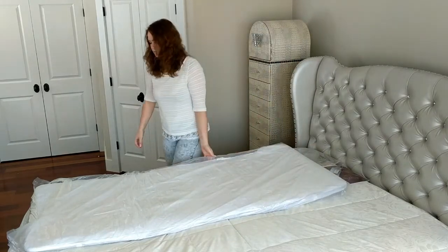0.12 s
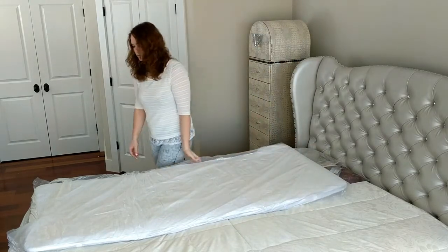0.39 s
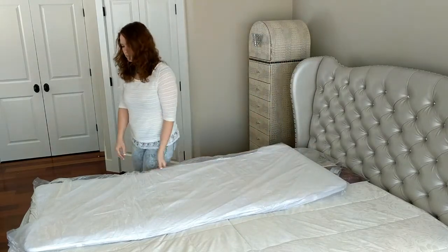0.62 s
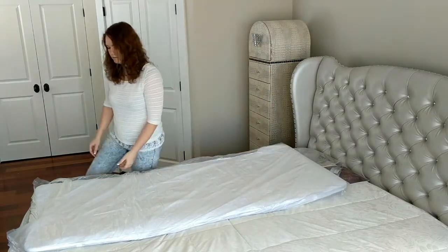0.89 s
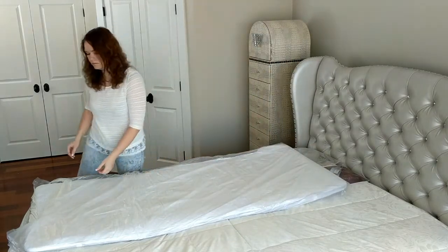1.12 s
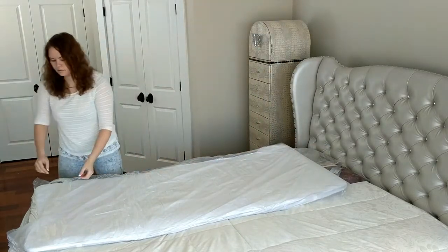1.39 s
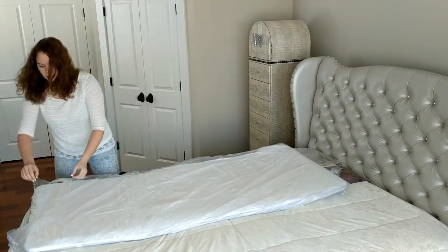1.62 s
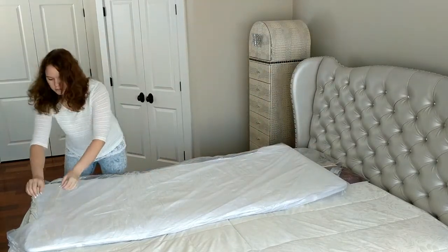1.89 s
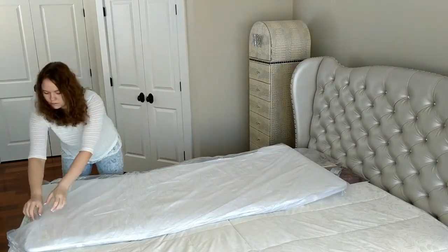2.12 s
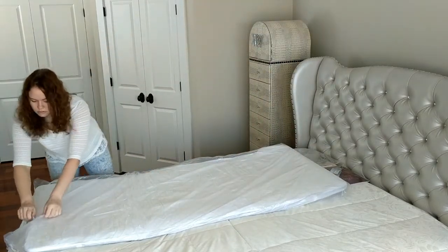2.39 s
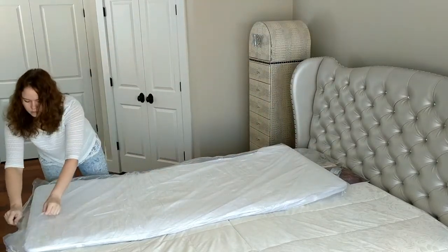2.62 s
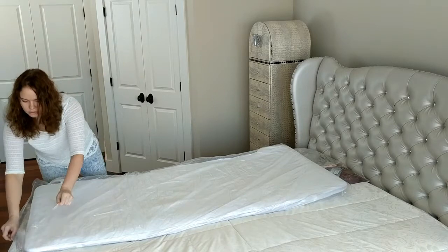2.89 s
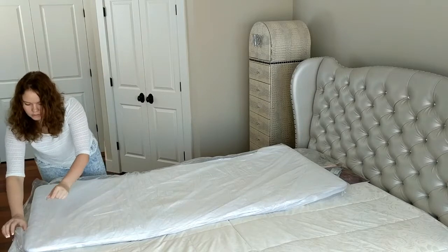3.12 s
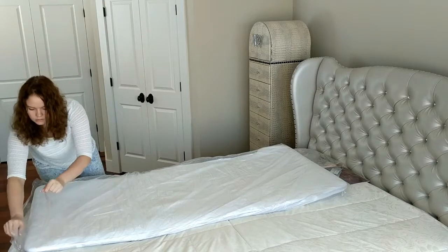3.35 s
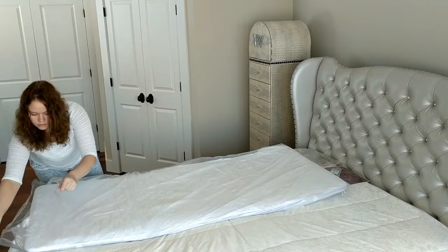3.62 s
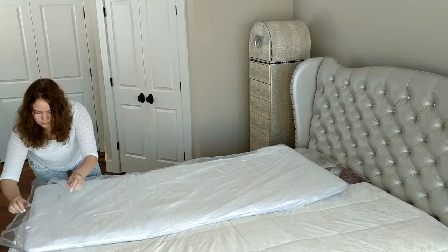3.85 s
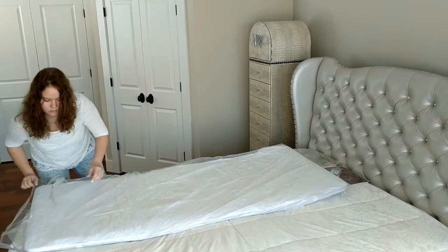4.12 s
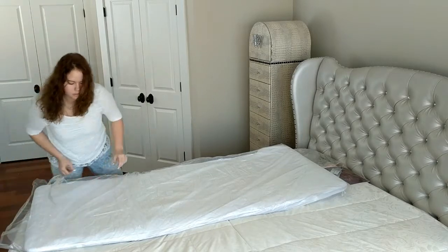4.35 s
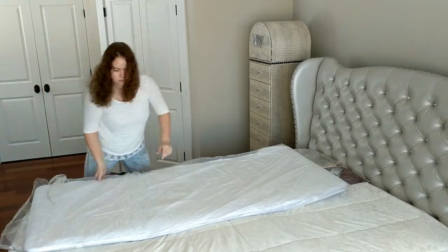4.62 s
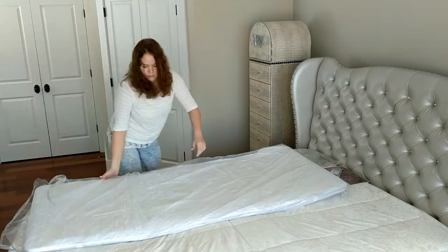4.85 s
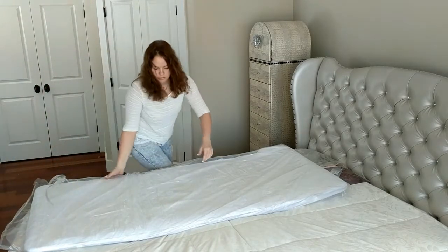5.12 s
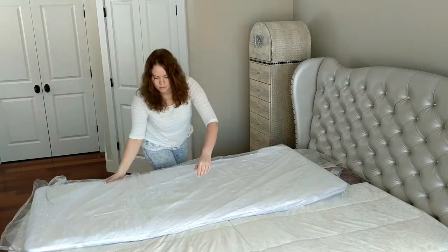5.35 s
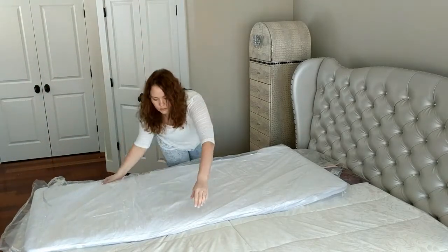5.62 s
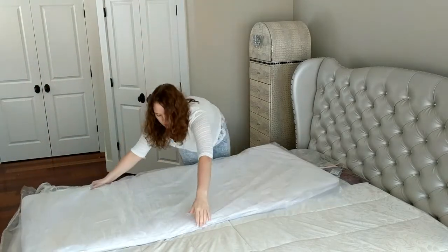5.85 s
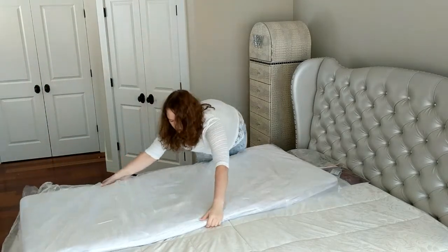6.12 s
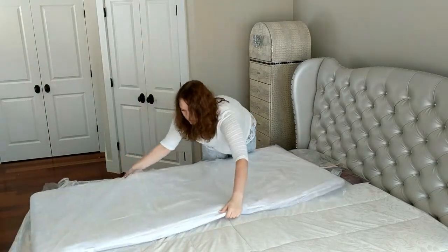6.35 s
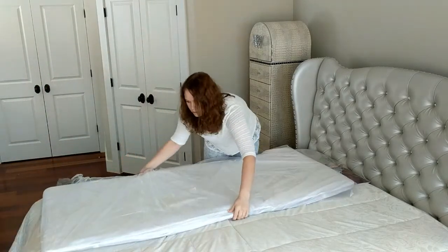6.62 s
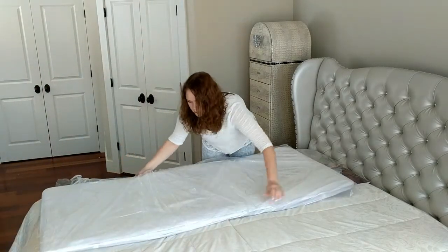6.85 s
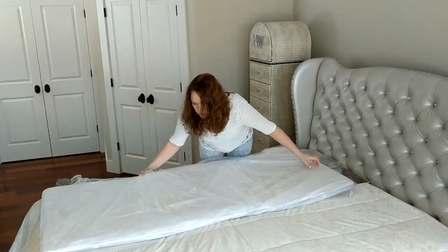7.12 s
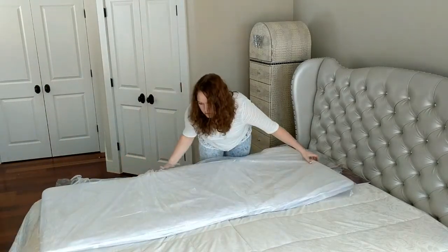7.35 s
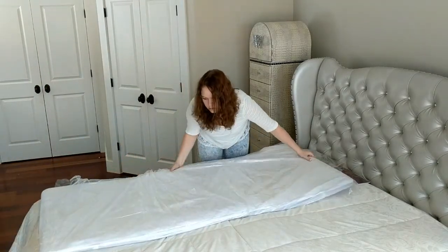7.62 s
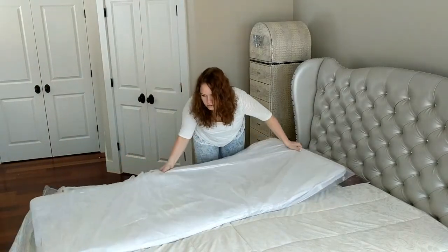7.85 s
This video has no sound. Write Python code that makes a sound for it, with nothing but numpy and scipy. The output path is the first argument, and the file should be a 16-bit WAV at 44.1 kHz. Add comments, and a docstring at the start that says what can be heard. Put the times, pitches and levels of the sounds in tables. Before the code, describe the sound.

Plastic wrapping rustles softly, goes almost quiet as someone steps with muffled low thuds, then crackles brightly in sharp tugs. Small sparse ticks follow in the middle, before a fuller sustained drag of crinkling film with bed and floor bumps. Further uneven rustles and snaps last to the end, rising again. Indoors in a bedroom, slight reverberation, very faint background hiss, mono pickup.

```python
"""Thin plastic film rustles from the start as hands pull and drag it around a padded mat on a bed.
Soft thuds of feet and a leaning knee come through the wooden floor and bed frame, over a faint room hiss.
Creases buckle as random tiny clicks, dense in a drag and single in a tug; filters give them their pitch.
The film and its snaps get a bedroom tail, the thuds shake wood resonances, and the sound is mono."""
import sys
import numpy as np
from scipy import signal
from scipy.fft import rfft, irfft, next_fast_len
from scipy.io import wavfile
from scipy.ndimage import uniform_filter1d, map_coordinates

SR = 44100
rng = np.random.default_rng(int(sys.argv[2]) if len(sys.argv) > 2 else 0)


def ratio(d):
    """dB to gain"""
    e = np.asarray(d, float) / 20
    return 10 ** e


def generate_wav(sig):
    """Save sig (samples, or channels by samples) to the path in sys.argv[1] as 16-bit PCM at SR."""
    pcm = np.round(np.clip(np.atleast_2d(sig).T, -1, 1) * 32767).astype(np.int16)
    wavfile.write(sys.argv[1], SR, pcm)


N = 352359  # length in samples
TOP_HZ = 15830  # upper limit of the sound


def unit(x):
    """Scaled to rms 1."""
    return x / np.sqrt(np.mean(x ** 2) + 1e-20)


def along(points, hz):
    """Values between (Hz, value) points, on a logarithmic pitch axis."""
    f, v = np.transpose(points)
    return np.interp(np.log(hz + 1), np.log(f + 1), v)


def curves(rows):
    """One value per sample for each column after the time."""
    s, *cols = np.transpose(rows)
    return [np.interp(np.arange(N) / SR, s, c) for c in cols]


def wobble(rate):
    """A smooth random curve through rate random points a second."""
    return map_coordinates(rng.standard_normal(N // 100), [np.arange(N) * rate / SR])


def filtered(x, response):
    """x shaped by a response over frequency."""
    m = next_fast_len(N + SR // 2)
    hz = np.fft.rfftfreq(m, 1 / SR)
    return irfft(rfft(x, m) * response(hz), m)[:N]


def causal(spectrum):
    """The minimum-phase response of a spectrum, so that a click has no sound before it."""
    def response(hz):
        cepstrum = irfft(np.log(ratio(along(spectrum, hz))))
        cepstrum[1:len(hz) - 1] *= 2
        cepstrum[len(hz):] = 0
        return np.exp(rfft(cepstrum))
    return response


def modes(table):
    """A sum of resonances, with every other one upside down."""
    def response(f):
        total = 0
        for k, (centre, width, db) in enumerate(table):
            damping = 1j * f * width
            total = total + (-1) ** k * ratio(db) * damping / (centre * centre - f * f + damping)
        return total
    return response


def buckles(rate, spread_db, clump_db):
    """Clicks of either sign at random moments, rate a second, many small and few large, in clumps."""
    when, size, sign = rng.random((3, N))
    size_db = np.minimum(-spread_db * np.log(1 - size), 11) + clump_db * wobble(45)
    return unit((when < rate / SR) * ratio(size_db) * np.sign(sign - .5))


def swell(s, swell_s, fade_s):
    """A level in dB that climbs to 0 at s and falls away again."""
    swell_db = 20.5  # climbed in swell_s and lost in fade_s
    late = np.arange(N, dtype=np.float32) / SR - s
    before, after = -late / max(swell_s, .004), late / max(fade_s, .004)
    return np.maximum(-swell_db * np.maximum(before, after), -90)


# The colour of the hiss. Each row: frequency in Hz, relative level in dB.
HISS_COLOUR = [(15, -23), (25, 2.5), (76, 4.5), (170, -7.5), (729, -14.5), (1010, -16.5), (3220, -20.5),
               (4330, -25.5), (12100, -29), (15800, -30)]


def hiss():
    """The quiet room and the microphone's own noise: random noise with a fixed colour."""
    noise = filtered(rng.standard_normal(N), lambda hz: ratio(along(HISS_COLOUR, hz)))
    return ratio(-65.5) * unit(noise)


# How long the bedroom rings. Each row: frequency in Hz, time to fall by 60 dB in seconds.
BEDROOM_DECAY = [(150, 0.86), (1000, 0.94), (4000, 0.68), (12000, 0.35)]


def bedroom(x, wet_db):
    """The direct sound plus a noise tail that dies faster in the treble; each third of a second gets a new tail."""
    out, step = np.pad(x, (0, SR)), SR // 3
    for start in range(0, N, step):
        hz, t, z = signal.stft(rng.standard_normal(SR // 2), SR, nperseg=256)
        decay = ratio(-60 * t / along(BEDROOM_DECAY, hz)[:, None])
        tail = signal.istft(z * decay, SR, nperseg=256)[1]
        echo = signal.fftconvolve(x[start:start + step], tail / np.linalg.norm(tail))
        out[start + 130:][:len(echo)] += ratio(wet_db) * echo  # the bed and the nearest wall answer after 3 ms
    return out[:N]


def steadied(x, seconds):
    """x with its chance swells evened out, as a firm push drives a mode without gaps."""
    power = np.abs(uniform_filter1d(unit(x) ** 2, int(seconds * SR)))
    return unit(x / np.sqrt(power + 0.2))


# The body leaning on boards and bed. Each row: time in seconds, load in dB before the trims below.
LEANING = [(0.0, -60), (0.73, -85), (1.02, -85), (1.29, -61), (1.67, -63), (2.07, -66), (2.36, -72),
           (2.83, -59), (3.05, -60.5), (4.18, -79), (4.58, -61), (4.98, -78), (5.3, -66), (6.5, -48),
           (6.72, -56), (7.03, -63), (7.59, -58), (7.99, -65)]
# The leading floor pitch shifts with the place of the load. Each row: time in seconds, pitch in Hz.
LOAD_PLACE = [(0.0, 58.6), (0.22, 56.3), (0.69, 59.3), (1.16, 54.6), (1.33, 45), (1.58, 52.8), (1.87, 70.2),
              (2.25, 66.7), (2.69, 71.7), (3.43, 48.2), (3.76, 72), (3.89, 63.8), (4.43, 65.9),
              (4.58, 53.3), (5.18, 56.4), (5.41, 44.05), (5.76, 61), (7.21, 67.1), (7.34, 67.3),
              (7.61, 44.8), (7.86, 52.4), (7.99, 59.4)]
# Footfalls and pushes of the knee. Each row: peak time in seconds, boom level in dB,
# knock level in dB before its trim, swell time and fade time in seconds (a little shorter for the knock).
FOOT_AND_KNEE = [(.13, -49, -63, 0.044, 0.081), (.33, -51, -73, 0.023, 0.044),
                 (.43, -54.5, -53, .04, 0.069), (.6, -63, -58, 0.065, .06), (0.999, -66, -66, 0.045, 0.065),
                 (1.136, -43, -37.5, 0.0092, 0.091), (1.165, -44, -37.5, 0.031, 0.12),
                 (1.22, -41.5, -59, 0.043, 0.036), (1.33, -47, -72, 0.071, 0.068),
                 (1.47, -68, -58, 0.073, 0.08), (1.65, -65, -58, 0.078, 0.048),
                 (1.87, -52, -49.5, 0.03, 0.093), (2.015, -41, -70, 0.042, 0.053),
                 (2.38, -65, -65, .05, 0.035), (2.67, -56.5, -46.5, 0.21, 0.029),
                 (2.709, -62, -35, 0.022, 0.014), (2.85, -64, -72, .1, .06), (3.43, -50, -47, 0.09, .09),
                 (3.76, -68, -57, .04, 0.079), (4.4, -66, -54, .02, .03), (4.43, -54, -71, 0.046, 0.076),
                 (4.52, -70, -51.5, 0.054, 0.16), (4.61, -48.5, -52, 0.093, .025),
                 (4.69, -56, -70, 0.038, 0.046), (4.811, -56, -71, 0.062, 0.022),
                 (5.05, -62, -77, 0.058, .1), (5.18, -56, -77, .05, .15), (5.32, -51, -69, 0.074, 0.043),
                 (5.41, -53, -69, 0.076, 0.079), (5.63, -51.5, -51, 0.18, 0.046),
                 (5.76, -43, -43, 0.025, 0.036), (5.855, -44.5, -44, 0.13, 0.069),
                 (5.96, -50, -63, 0.086, 0.057), (6.05, -53, -47.5, 0.096, .2),
                 (6.24, -38.5, -41, .05, 0.11), (6.38, -53, -44.5, .06, .06), (6.48, -51, -61, .06, .05),
                 (6.609, -43.5, -38.5, 0.055, 0.074), (6.68, -46.5, -55, 0.077, 0.048),
                 (6.79, -58.5, -56.5, 0.13, 0.018), (7.0, -69, -59, 0.13, .04),
                 (7.09, -50, -60, 0.045, 0.055), (7.19, -64, -64, .1, 0.024), (7.37, -57, -52, 0.22, 0.054),
                 (7.41, -57, -45.5, 0.036, 0.11), (7.54, -51, -54, 0.081, .15),
                 (7.68, -56, -52, 0.074, 0.23), (7.97, -51, -44, .05, 0.047)]
# Low resonances of floor and bed, used twice over.
# Each row: pitch in Hz, width in Hz, level in dB for one pass.
FLOOR_MODES = [(40, 9.9, -10), (71, 33, -7), (92, 31, -5.5)]
# Woody resonances of the bed frame, used twice over.
# Each row: pitch in Hz, width in Hz, level in dB for one pass.
FRAME_MODES = [(119.4, 32, -1.5), (216, 111, 0.5), (348, 145, 2.5), (560, 450, -6.5)]


def weight():
    """Soft pushes shake the low modes of floor and bed, one of them leading; harder contacts knock the wood."""
    (load_db,), (mode_hz,) = curves(LEANING), curves(LOAD_PLACE)
    boom_power = ratio(load_db - 9.0 + 4.1 * wobble(24)) ** 2
    # The handled mat works the bed frame too, following the effort of the hands.
    knock_power = (ratio(-20 + 0.84 * wobble(10)) * effort(0.8)) ** 2
    knock_power += ratio(load_db - 7.0 + 1.8 * wobble(4.8)) ** 2
    for s, boom_db, knock_db, swell_s, fade_s in FOOT_AND_KNEE:
        boom_power += ratio(boom_db + swell(s, swell_s, fade_s)) ** 2
        knock_power += ratio(knock_db - 5.5 + swell(s, 0.95 * swell_s, 0.82 * fade_s)) ** 2
    lead = np.sin(2 * np.pi * np.cumsum(mode_hz + 4 * wobble(14)) / SR)
    floor, frame = modes(FLOOR_MODES), modes(FRAME_MODES)
    boom = filtered(filtered(rng.standard_normal(N), floor), floor)
    knock = filtered(filtered(buckles(300, spread_db=0.5, clump_db=0.0), frame), frame)
    lows = unit(1.3 * lead + .45 * unit(boom))
    return np.sqrt(boom_power) * lows + np.sqrt(knock_power) * steadied(knock, 0.022)


# The steady drag of the film. Each row: time in seconds, effort in dB,
# fineness in dB (how far fine creases outweigh large folds).
STEADY_DRAG = [(0.0, -48, -6), (0.51, -56.5, 5.5), (0.75, -72.5, 4), (1.07, -71.5, -5), (1.6, -61.5, 2),
               (2.07, -66.5, 0), (2.22, -55.5, -2), (2.4, -49.5, -0.5), (2.76, -45.5, 2), (3.09, -64, 3),
               (3.49, -60, -4), (4.07, -67, -5.5), (4.47, -72, -8), (4.67, -50, 1), (4.96, -66.5, -3),
               (5.18, -68, 2), (5.32, -55, 8.5), (5.58, -57.5, -16), (5.81, -67, 0), (6.27, -37, 4.5),
               (6.9, -58.5, 2), (7.12, -53, -10), (7.21, -48.5, -0.5), (7.99, -35, 6)]
# Strokes of the hands over the drag. Each row: peak time in seconds, effort in dB,
# swell time and fade time in seconds, fineness in dB.
HAND_STROKES = [(.17, -51.5, 0.13, 0.035, -2), (.29, -46.5, 0.023, 0.088, 0.5),
                (.44, -52, 0.23, 0.18, -8.5), (.62, -51, 0.21, 0.086, -4.5), (.71, -66, 0.11, 0.13, -15.5),
                (1.16, -59, 0.075, 0.042, -2), (1.22, -60, 0.036, 0.07, -16),
                (1.42, -56.5, 0.035, 0.25, -4), (1.78, -65.5, 0.82, 0.065, -11.5),
                (1.87, -60, 0.035, .12, -4), (2.07, -58, 0.021, 0.14, -2), (2.235, -49.5, 0.063, 0.059, 1),
                (2.257, -44, .006, 0.21, 4.5), (2.335, -42, .03, 0.041, 5), (2.356, -32.5, 0.022, 0.12, 4),
                (2.601, -45, 0.01, 0.21, -5), (2.67, -36.5, 0.07, 0.054, 4), (2.715, -33, 0.11, 0.1, 0),
                (2.83, -40.5, 0.26, 0.1, 3), (2.96, -46, 0.14, 0.16, 0.5), (3.05, -49, 0.025, 0.15, -4.5),
                (3.3, -50.5, 0.045, 0.087, 12), (3.355, -38, 0.047, 0.25, -1),
                (3.429, -36.5, 0.29, 0.091, -0.5), (3.59, -51.5, .005, 0.21, 3),
                (3.76, -50, 0.077, 0.032, -3.5), (3.83, -50.5, 0.15, 0.19, -1), (4.025, -61.5, .02, .15, 3),
                (4.5, -51, 0.029, 0.47, -2), (4.61, -47, 0.15, 0.11, -0.5), (4.75, -64, .05, 0.12, 5),
                (4.94, -58, 0.03, 0.16, -5), (5.085, -57, 0.019, 0.05, 4), (5.16, -50, 0.095, 0.72, -1),
                (5.24, -53, 0.036, 0.053, 5), (5.32, -53, 0.055, 0.23, -7.5),
                (5.56, -46, 0.033, 0.052, 1.5), (5.65, -39, 0.11, 0.44, -0.5), (5.76, -37, 0.23, 0.68, 3),
                (5.86, -43, 0.19, 0.038, 4), (6.01, -35.5, 0.053, 0.42, 3.5), (6.21, -36.5, 0.3, 0.22, -3),
                (6.34, -34.5, 0.096, 0.17, 1), (6.44, -43.5, 0.094, 0.3, -2.5),
                (6.51, -47, 0.08, 0.078, -9), (6.55, -46.5, 0.1, 0.082, 8.5),
                (6.701, -46, 0.084, 0.24, 2.5), (6.81, -49.5, 0.29, 0.044, -1),
                (6.9, -47.5, 0.051, 0.1, -0.5), (7.09, -40.5, 0.05, 0.24, 2.5), (7.19, -52, 0.13, 0.18, 9),
                (7.41, -45.5, 0.089, 0.076, 5.5), (7.545, -40, 0.085, 0.1, 5), (7.62, -47, 0.035, 0.13, -3),
                (7.7, -40, 0.13, 0.58, -1)]


def effort(coarse):
    """The gain of drag and strokes together, for folds that lose (coarse > 0) or win by fineness."""
    drag_db, fine_db = curves(STEADY_DRAG)
    power = ratio(drag_db - coarse * fine_db) ** 2
    for s, db, swell_s, fade_s, fine_db in HAND_STROKES:
        power += ratio(db - coarse * fine_db + swell(s, swell_s, fade_s)) ** 2
    return np.sqrt(power)


# Sudden tugs that set off a shower of crackle. Each row: time in seconds, tug level in dB,
# level in dB of the folds before their boost, pitch of the folds in Hz, time to fall by 60 dB in seconds.
# The fold level counts from the tug level.
SUDDEN_TUGS = [(0.545, -38, -8, 2360, 0.23), (1.204, -57, 9, 2400, 0.25), (1.402, -56, 4.5, 826, 0.41),
               (1.8675, -55, -6, 2040, 0.1), (2.2003, -34, -14, 2470, 0.45), (2.252, -37, -5, 2110, 0.14),
               (2.3515, -18, -29, 1920, 0.16), (2.59, -33, -9, 762, 0.31), (2.7026, -25, -8, 3360, 0.076),
               (2.711, -34, 5, 1380, 0.19), (3.0395, -49, 2, 2700, 0.1), (3.342, -15, -17, 2200, 0.11),
               (3.358, -41, 8, 1000, 0.13), (3.5875, -46.5, 3, 2490, 0.27), (4.4792, -45, -1, 797, 0.091),
               (4.762, -49.5, 5.5, 1400, 0.098), (4.883, -51, 5.5, 1750, 0.12), (4.905, -60, 8, 1700, .15),
               (4.9394, -58, 13, 734, 0.093), (5.518, -49.5, 8.5, 587, 0.44),
               (6.7944, -46.5, 1.5, 4525, 0.21), (7.0773, -36, -5, 2203, 0.11), (7.372, -30, -22, 2000, .1),
               (7.512, -35.5, -5, 2194, 0.34)]


def showers():
    """At each tug the crackle jumps and dies away (a gain); the folds it pulls sound around their own pitch."""
    t, folds, gain = np.arange(N) / SR, np.zeros(N), np.zeros(N)
    flips = .7 * buckles(1500, spread_db=2.5, clump_db=1.1) + .6 * rng.standard_normal(N)
    for s, db, fold_db, fold_hz, t60 in SUDDEN_TUGS:
        onset = np.clip((t - s) / 0.0055 + .5, 0, 1)  # rises within 5.5 ms
        dying = onset * ratio(db - 60 * np.abs(t - s) / t60)
        gain += ratio(-18.0) * dying
        ring = modes([(fold_hz, fold_hz, 0)])
        folds += filtered(ratio(fold_db + 6) * dying * flips, lambda hz: ring(hz) ** 2)
    return folds, gain


def pops(count, centre_hz, spread, cycle_db, spread_db):
    """Folds that flip at random moments, each ringing briefly at its own pitch and losing cycle_db a cycle."""
    when, size = rng.random((2, count, 1))
    hz = np.minimum(centre_hz * np.exp(spread * rng.standard_normal((count, 1))), TOP_HZ)
    k = np.arange(256)
    size_db = np.minimum(-spread_db * np.log(1 - size), 12)
    rings = ratio(size_db - cycle_db * hz * k / SR) * np.sin(2 * np.pi * hz * k / SR) * np.sqrt(hz)
    places = (when * N).astype(int) + k
    return unit(np.bincount(places.ravel(), rings.ravel(), minlength=N)[:N])


def patchy(x):
    """x with random patches of gain over time and frequency, as different folds take over."""
    patch_hz, patch_s, patch_db = 700, .05, 1.5  # size and depth of a patch
    hz, t, z = signal.stft(x, SR, nperseg=512)
    field = uniform_filter1d(rng.standard_normal(z.shape), size=max(int(patch_hz / hz[1]), 1), axis=0)
    field = uniform_filter1d(field, size=max(int(patch_s / t[1]), 1), axis=1)
    return unit(signal.istft(z * ratio(patch_db * unit(field)), SR, nperseg=512)[1][:N])


# The colour of the large folds. Each row: frequency in Hz, relative level in dB.
LARGE_FOLD_COLOUR = [(200, -31.5), (450, -5), (800, -1.5), (1400, -1), (2200, -3.5), (4000, -23)]
# The colour of the small folds. Each row: frequency in Hz, relative level in dB.
SMALL_FOLD_COLOUR = [(800, -30), (1600, -3), (2400, 1.5), (4500, 0.5), (6000, -2), (10000, -36)]
# The colour of the fine creases, also used by snaps(). Each row: frequency in Hz, level in dB.
CREASE_COLOUR = [(2000, -57), (4500, 6), (6500, 5), (8500, 4), (12500, 1.5), (14500, 0.5), (15800, -2)]


def film():
    """Folds of three sizes sound from partly the same bucklings; sliding adds a smooth hiss."""
    pulled_folds, crease_shower = showers()
    fine = buckles(2600, spread_db=2.7, clump_db=1.8)
    broad = pops(count=9000, centre_hz=2056, spread=0.674, cycle_db=6.5, spread_db=2.5)
    ticks = pops(count=2500, centre_hz=9000, spread=.35, cycle_db=6, spread_db=3)
    slide = rng.standard_normal((3, N))
    scrunch = patchy(filtered(0.15 * broad + .5 * slide[0], causal(LARGE_FOLD_COLOUR)))
    rustle = patchy(filtered(0.32 * fine + 0.21 * broad + .5 * slide[1], causal(SMALL_FOLD_COLOUR)))
    crackle = patchy(filtered(.55 * fine + .25 * ticks + .65 * slide[2], causal(CREASE_COLOUR)))
    finest = unit(filtered(crackle, modes([(11500, 7700, 0)])))  # a tug snaps the tightest creases
    large = ratio(-6.5 + 0.73 * wobble(18)) * effort(0.8) * scrunch
    small = ratio(-6.0 + 0.78 * wobble(24)) * effort(0.024) * rustle
    creases = ratio(-8 + 1.5 * wobble(16)) * effort(-0.66) * crackle
    return large + small + creases + ratio(-3) * crease_shower * finest + pulled_folds


# Single creases that snap. Each row: time in seconds (the snap sounds 1.2 ms later), click level in dB before
# colouring, # crease pitch in Hz, fold level in dB before its trim, fold pitch in Hz.
CREASE_SNAPS = [(0.2623, -47, 8590, -39, 1410), (0.3691, -38, 9880, -42, 1030),
                (0.5427, -42, 6840, -54, 1770), (0.5464, -40, 7410, -52, 2380),
                (1.8677, -54, 7050, -52, 2043), (2.0652, -42, 13800, -59, 2600),
                (2.2, -40, 11600, -51, 2360), (2.2047, -44, 11100, -49, 4450),
                (2.2287, -38, 12900, -43, 2480), (2.2523, -25, 10900, -43, 2060),
                (2.2555, -39, 7340, -46, 1680), (2.266, -26, 13200, -37, 2130),
                (2.3204, -37, 7800, -44, 1370), (2.3296, -22, 13500, -44, 4690),
                (2.3344, -28, 11500, -37, 4660), (2.3494, -24, 8500, -34, 3000),
                (2.3508, -16, 13500, -29, 4000), (2.3533, -17, 9000, -36, 5000),
                (2.3574, -18, 7640, -36, 4400), (2.3635, -19, 10900, -19, 5300),
                (2.365, -23, 13000, -28, 2500), (2.3706, -30, 7000, -26, 5300),
                (2.5523, -34, 12500, -55, 3010), (2.5862, -41, 12500, -50, 3000),
                (2.59, -34, 7800, -49, 2160), (2.5934, -32, 7780, -56, 775),
                (2.6386, -28, 12000, -45, 3000), (2.6439, -25, 10500, -32, 4500),
                (2.6605, -24, 10000, -40, 4000), (2.6584, -26, 11500, -33, 1940),
                (2.6776, -21, 13300, -35, 1230), (2.6992, -21, 11000, -45, 4640),
                (2.7002, -19, 11000, -40, 5000), (2.7016, -21, 9000, -36, 3000),
                (2.7022, -12, 11900, -33, 4430), (2.7031, -23, 8500, -38, 6000),
                (2.7081, -33, 7060, -26, 1310), (2.7113, -30, 9500, -24, 4400),
                (2.715, -27, 9800, -24, 4700), (2.8, -25, 12500, -44, 1240), (2.8065, -22, 8600, -42, 2010),
                (2.8183, -20.5, 10500, -41, 4280), (2.866, -35, 8000, -47, 3120),
                (2.9402, -36, 7220, -40, 2630), (3.0375, -41, 8950, -33.5, 2770),
                (3.082, -53.5, 8510, -41.5, 1020), (3.1198, -40, 12300, -55, 1330),
                (3.1522, -43, 7860, -52, 926), (3.1625, -40, 11500, -53, 2000),
                (3.2241, -33, 12800, -49, 2800), (3.2405, -35, 6910, -55, 783),
                (3.2899, -33, 7830, -31, 4480), (3.2976, -34, 11500, -50, 3020),
                (3.3279, -34, 11500, -45, 3000), (3.3414, -24, 10500, -42, 3000),
                (3.3448, -23, 8250, -42, 3730), (3.3472, -22, 12200, -42, 970),
                (3.4823, -42, 11500, -48, 3720), (3.5305, -46, 12060, -55, 3000),
                (3.5871, -34, 11500, -31, 3400), (3.5916, -41.5, 6550, -40, 1300),
                (3.6142, -31, 11000, -48, 1960), (3.8043, -34, 12500, -46, 1133),
                (3.8841, -46, 9850, -55, 2430), (4.2278, -50.5, 6780, -64.5, 1810),
                (4.2403, -50, 6000, -65, 1297), (4.4795, -56, 7930, -54, 773),
                (4.4926, -44, 12500, -58, 1006), (4.5014, -43, 13000, -58, 2000),
                (4.5242, -52, 8010, -37, 2200), (4.6459, -40, 11500, -52, 1993),
                (4.575, -38, 6730, -44, 778), (4.6586, -38, 11500, -51, 1230),
                (4.727, -40, 9460, -46, 1550), (4.7665, -49, 9120, -38, 1400),
                (4.8449, -44, 7220, -58, 996), (4.8803, -42, 5500, -34, 1770),
                (4.8839, -55, 9000, -41, 1720), (4.938, -62, 8280, -43, 794),
                (5.0747, -47, 12500, -51, 1120), (5.1347, -45, 6640, -44, 1417),
                (5.1642, -43, 9050, -43, 1270), (5.2329, -40, 12930, -55, 2000),
                (5.2642, -52, 8000, -43, 2020), (5.2909, -29, 12500, -54, 962),
                (5.5421, -34, 11500, -37, 605), (5.6072, -31, 9520, -50, 746),
                (5.671, -31, 7000, -36, 4300), (5.7214, -36, 7040, -35, 1898),
                (5.7604, -34, 6770, -27, 2360), (5.8546, -26, 12000, -45, 3000),
                (5.8507, -24, 12500, -42, 4440), (5.9858, -26, 9000, -34, 1340),
                (6.1505, -26, 10540, -40, 3000), (6.1644, -26, 10480, -40, 2990),
                (6.158, -26, 12200, -37, 3170), (6.1754, -20, 11500, -38, 4460),
                (6.237, -24, 7160, -30, 612), (6.2568, -18, 10750, -32, 830),
                (6.2719, -23, 11000, -32, 765), (6.2798, -21, 11000, -31, 1006),
                (6.3286, -25, 12500, -34, 3200), (6.364, -23, 10000, -39, 2520),
                (6.3867, -35, 11000, -26, 1620), (6.49, -29, 5600, -44, 1997),
                (6.5604, -28.5, 6680, -52, 870), (6.7937, -32, 6180, -48, 3020),
                (6.7979, -33, 6560, -47, 4410), (6.8346, -43, 13000, -51, 3900),
                (6.8713, -41, 6900, -32, 5010), (6.9906, -42, 12500, -58, 895),
                (7.0574, -41, 12450, -47, 1846), (7.0748, -38, 6630, -45, 2167),
                (7.3731, -31.5, 10650, -47, 2270), (7.3807, -32, 14340, -44, 3210),
                (7.493, -32.5, 12000, -41, 2250), (7.5276, -27, 11500, -38, 2500),
                (7.5344, -36, 9320, -34.5, 2350), (7.544, -39, 6900, -31, 2220),
                (7.5783, -32.5, 13000, -45, 2500), (7.636, -29, 6920, -45, 929),
                (7.7003, -27, 12000, -42, 2500), (7.7039, -31, 9000, -36, 1990),
                (7.7474, -29, 8170, -46, 1270), (7.8671, -26, 11500, -24.5, 4900),
                (7.967, -22, 12500, -43, 3450)]


def snaps():
    """Each snap is a short ping of its crease with a little splintering; the fold around it rings briefly."""
    delay_s = .0012  # each snap sounds this long after its time in the table
    bounce_s, bounce_db = .0038, -7.5  # each snap comes back once from a hard surface nearby
    clicks, folds, k = np.zeros(N + 600), np.zeros(N + 600), np.arange(600)
    noise = rng.standard_normal((len(CREASE_SNAPS), 600))
    for (s, click_db, crease_hz, fold_db, fold_hz), splinters in zip(CREASE_SNAPS, noise):
        start = round((s + delay_s) * SR)
        ping = ratio(-7 * crease_hz * k / SR) * np.cos(2 * np.pi * crease_hz * k / SR)  # loses 7 dB a cycle
        burst = 0.7 * ping + .17 * splinters * ratio(-60 * k / SR / .006)  # splinters die in 6 ms
        clicks[start:][:600] += ratio(click_db) * np.sign(splinters[-1]) * burst
        fold_gain = ratio(fold_db - 1.0 - 5 * fold_hz * k / SR)  # loses 5 dB a cycle
        folds[start:][:600] += fold_gain * np.sin(2 * np.pi * fold_hz * k / SR)
    direct = filtered(clicks[:N], causal(CREASE_COLOUR)) + folds[:N]
    return direct + ratio(bounce_db) * np.pad(direct, (round(bounce_s * SR), 0))[:N]


def scene():
    """One microphone feeds both channels; only film and snaps get the bedroom tail."""
    mono = bedroom(film() + snaps(), wet_db=-11.0) + weight() + hiss()
    return np.array([mono, mono])


def top_cut(x):
    """Nothing passes above the cut-off."""
    return signal.sosfilt(signal.butter(12, 16850, fs=SR, output="sos"), x)


def record(dry):
    """Cuts the bass below about 29 Hz and everything above the upper limit, alike in both channels."""
    mono = filtered(dry[0], lambda hz: (hz < TOP_HZ) / (1 + (29 / (hz + 1)) ** 4))
    return top_cut(np.array([mono, mono]))


dry = scene()
out = record(dry)
generate_wav(out)
```